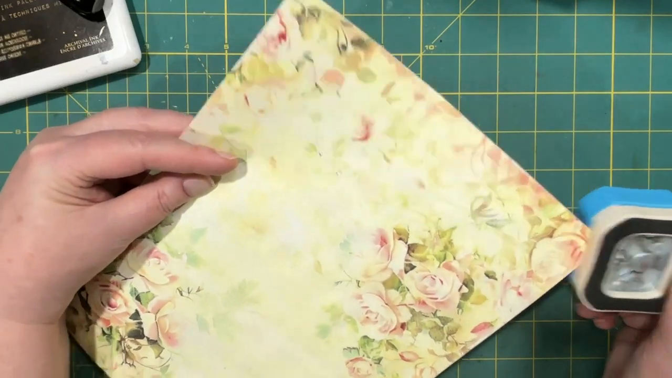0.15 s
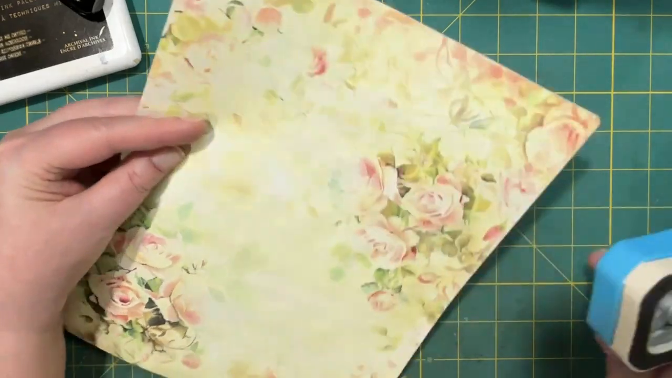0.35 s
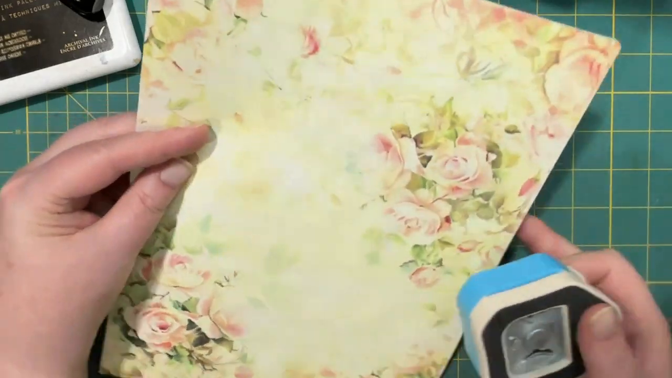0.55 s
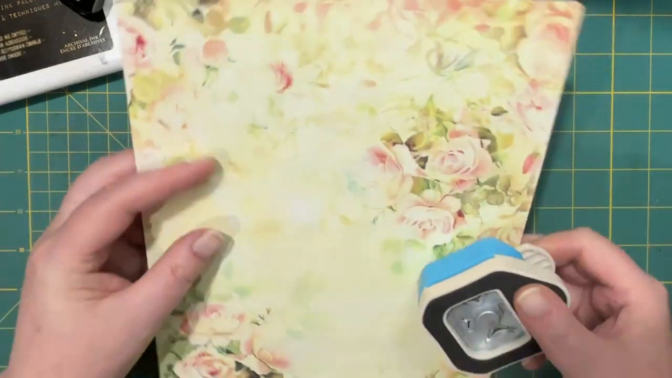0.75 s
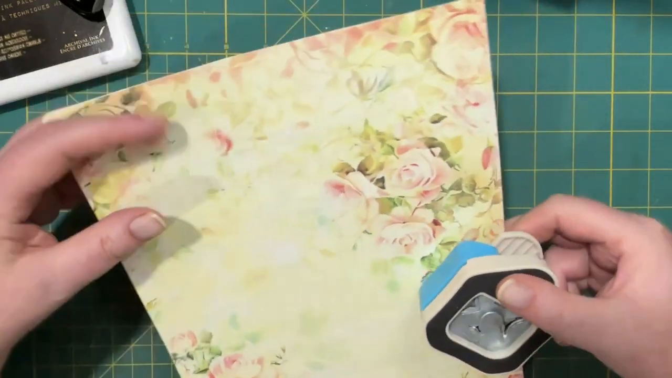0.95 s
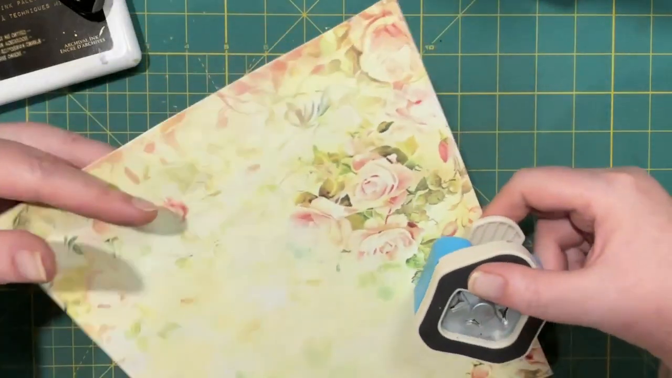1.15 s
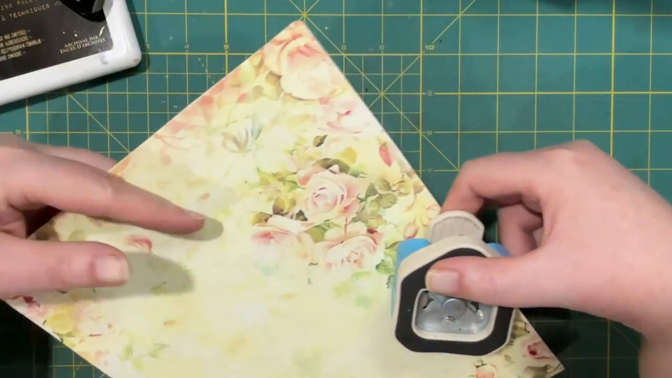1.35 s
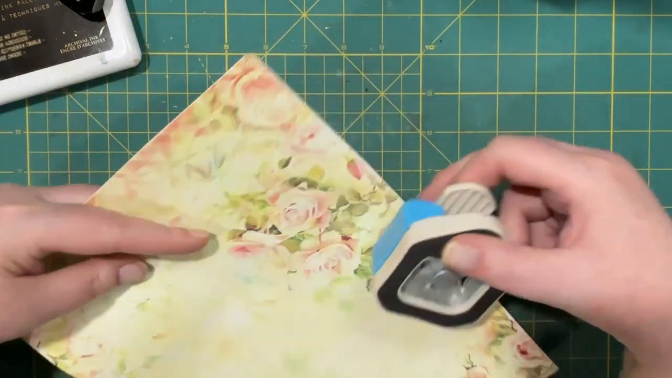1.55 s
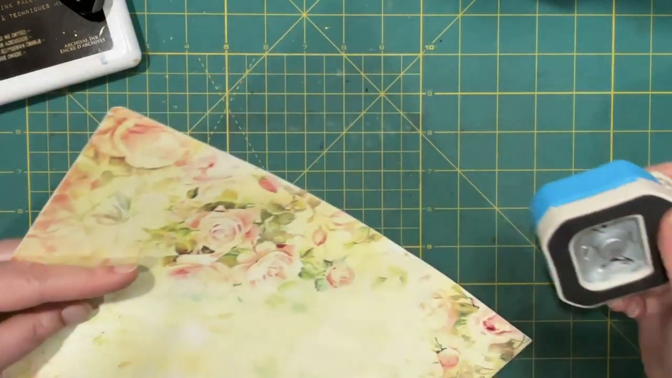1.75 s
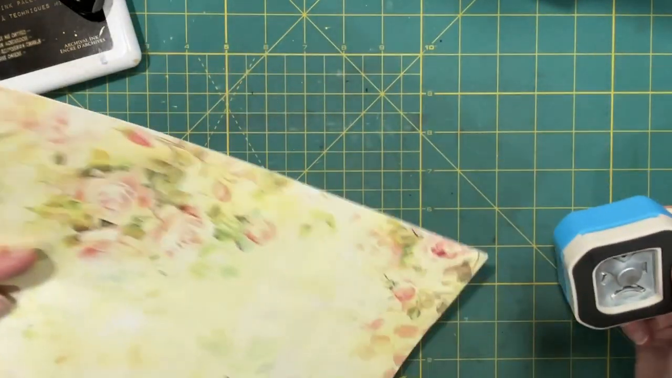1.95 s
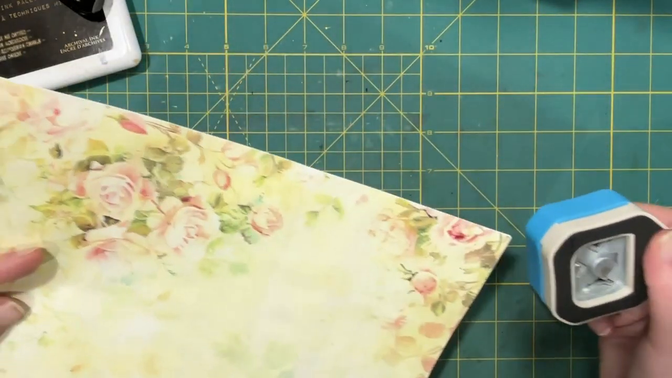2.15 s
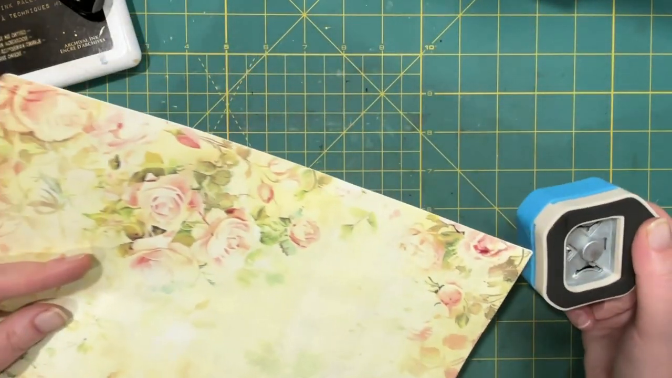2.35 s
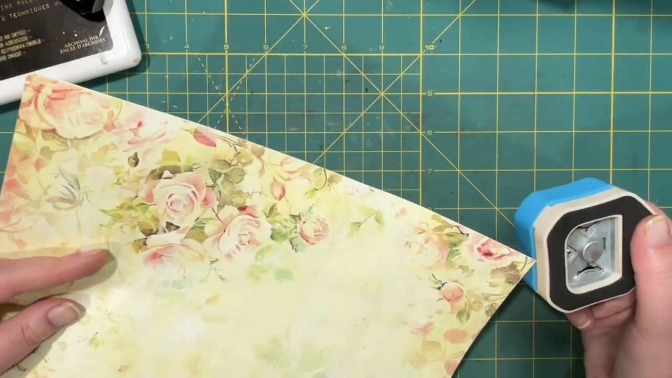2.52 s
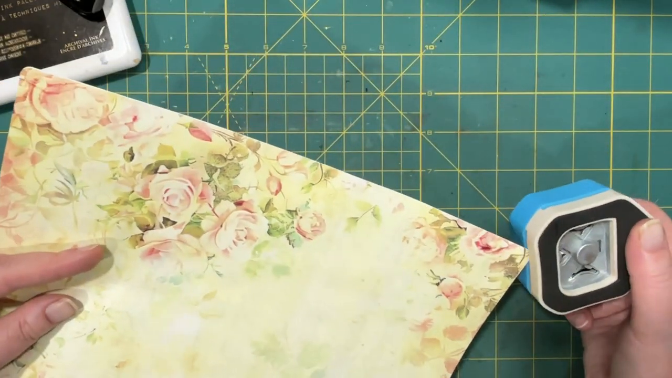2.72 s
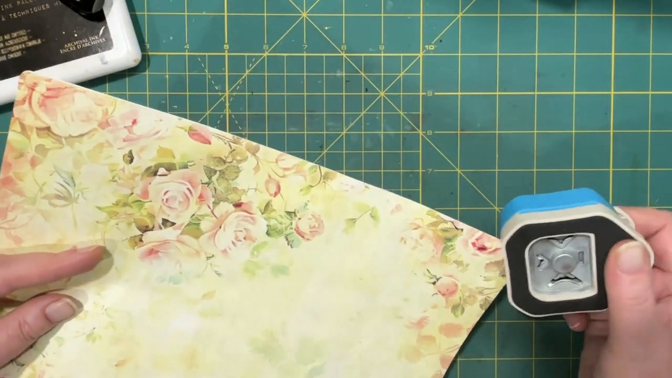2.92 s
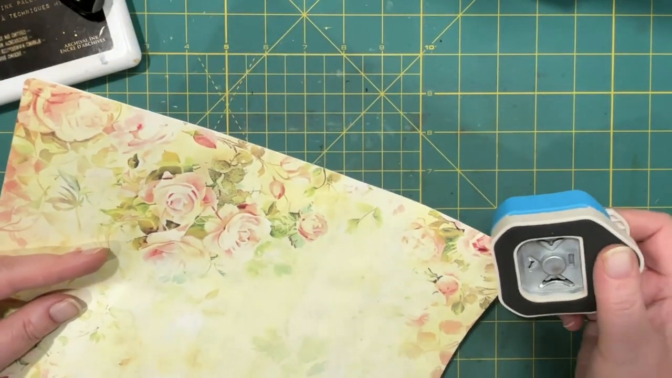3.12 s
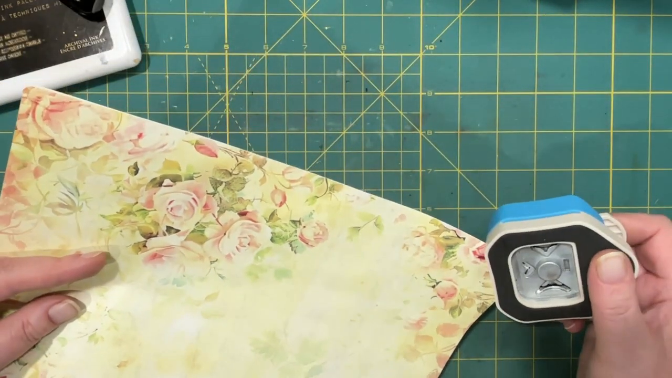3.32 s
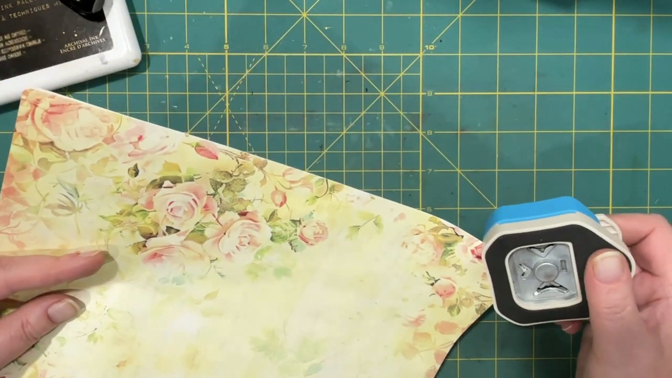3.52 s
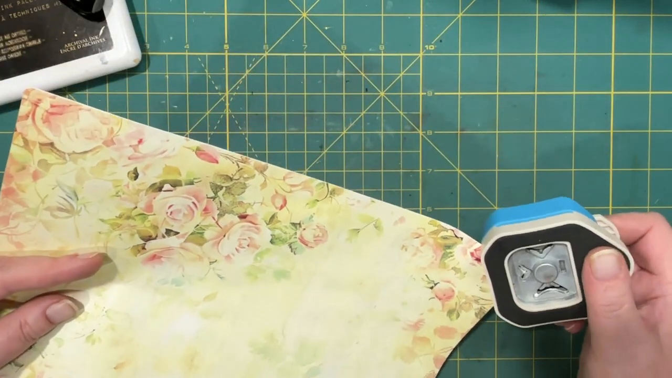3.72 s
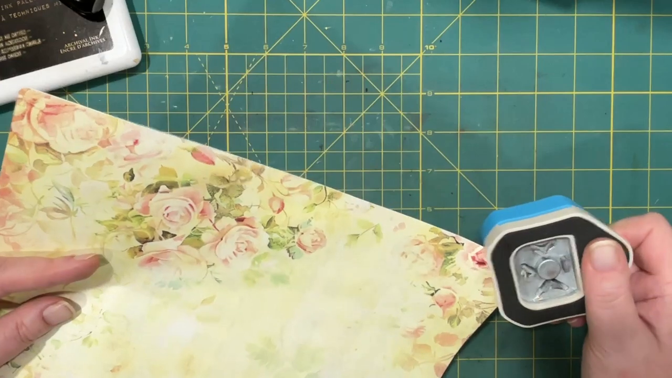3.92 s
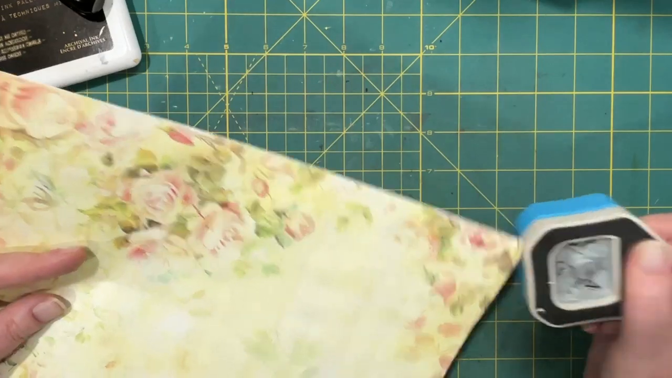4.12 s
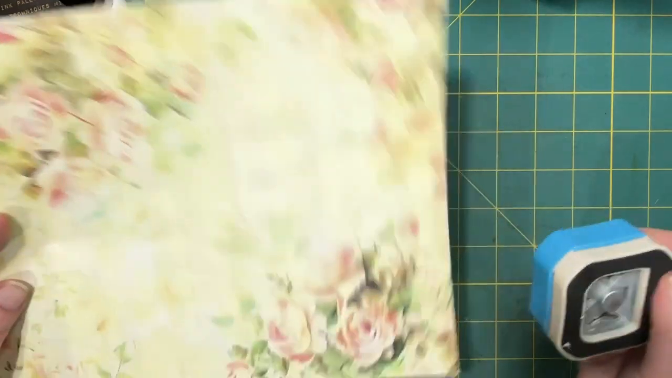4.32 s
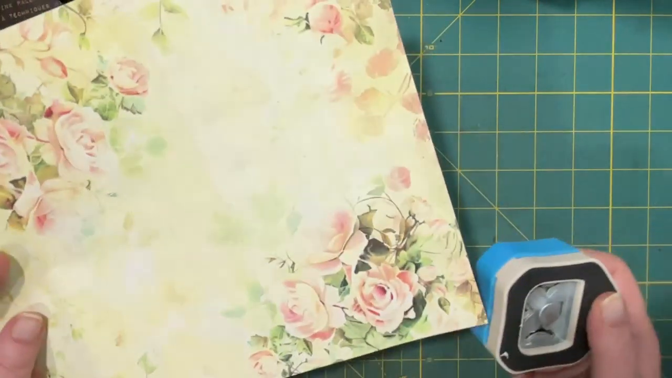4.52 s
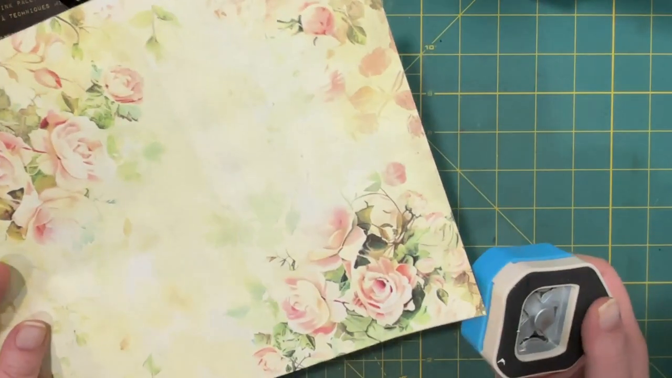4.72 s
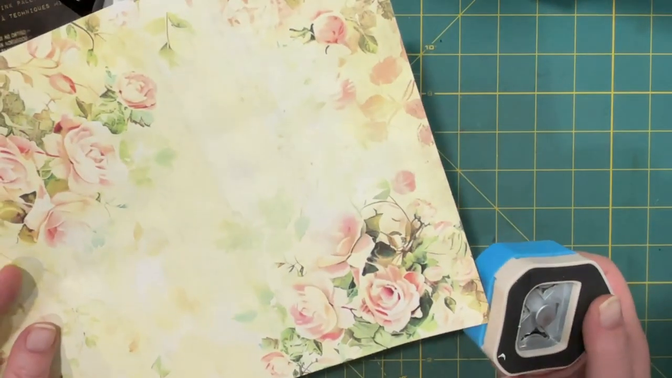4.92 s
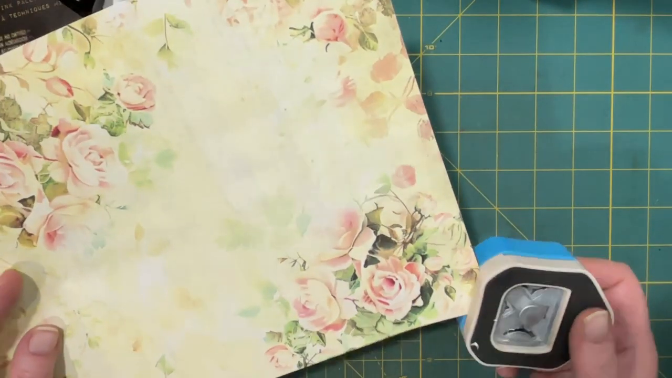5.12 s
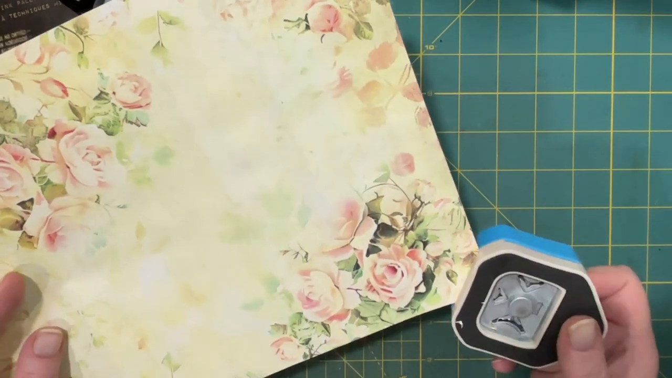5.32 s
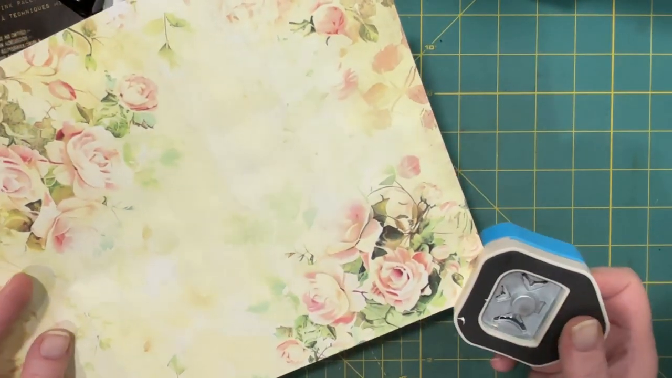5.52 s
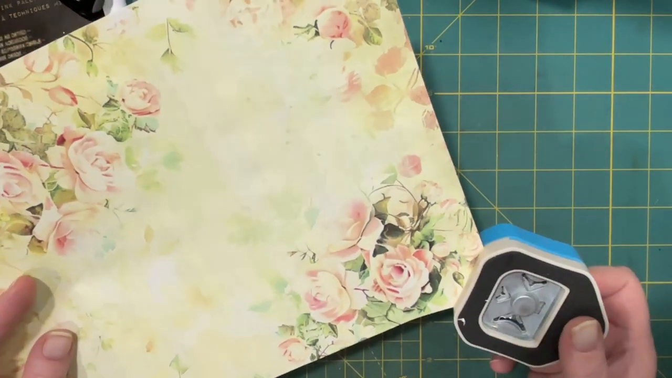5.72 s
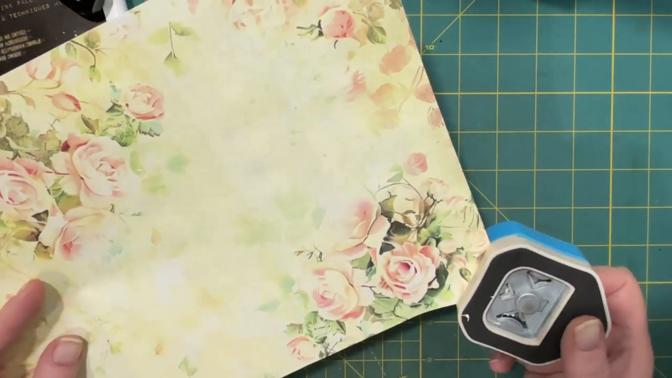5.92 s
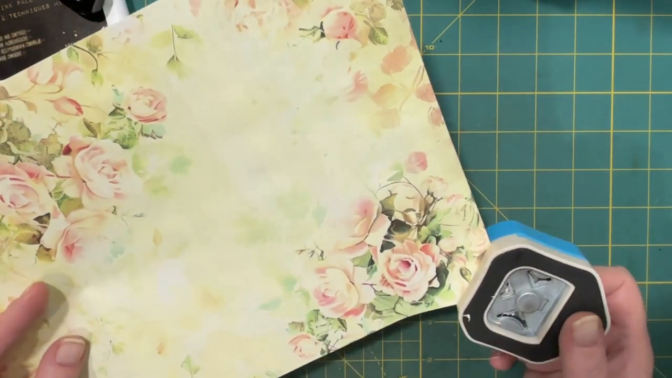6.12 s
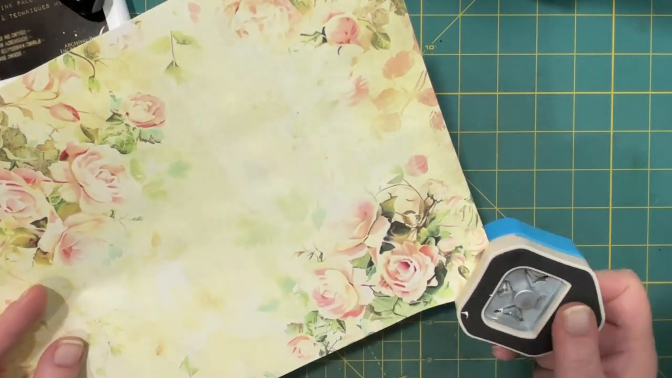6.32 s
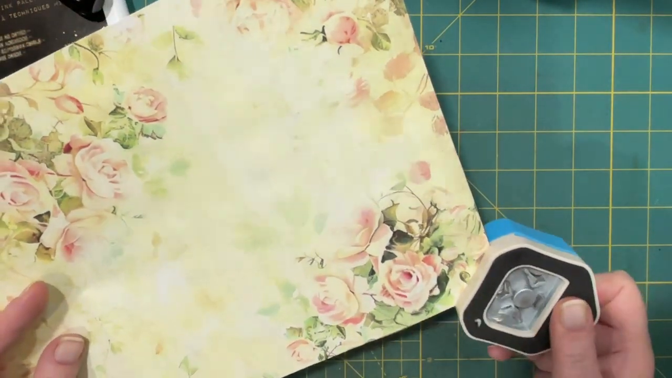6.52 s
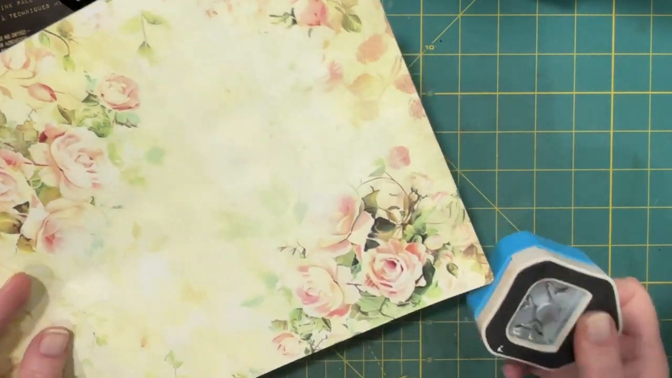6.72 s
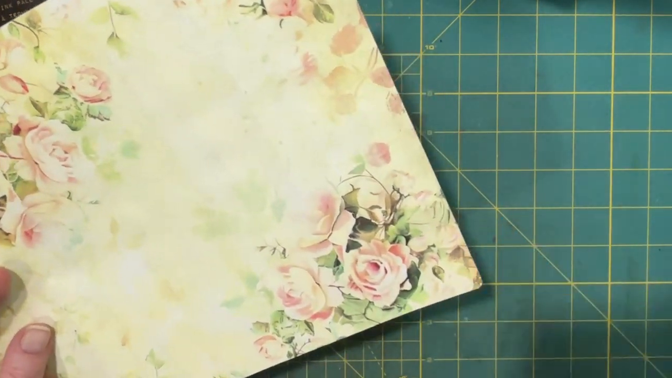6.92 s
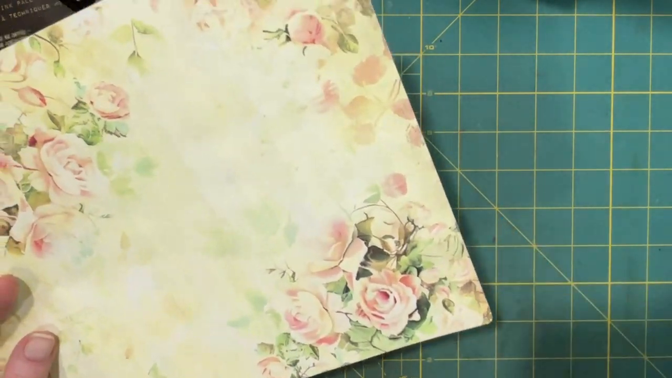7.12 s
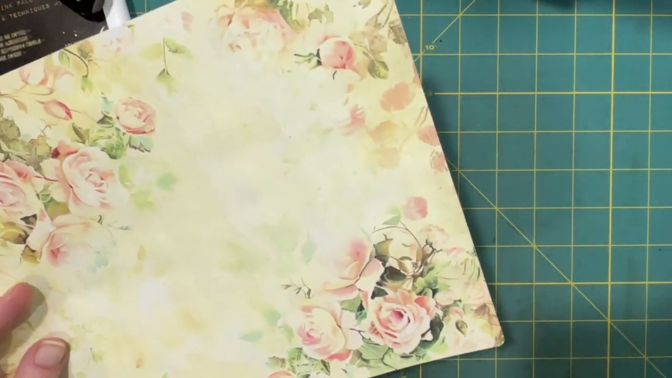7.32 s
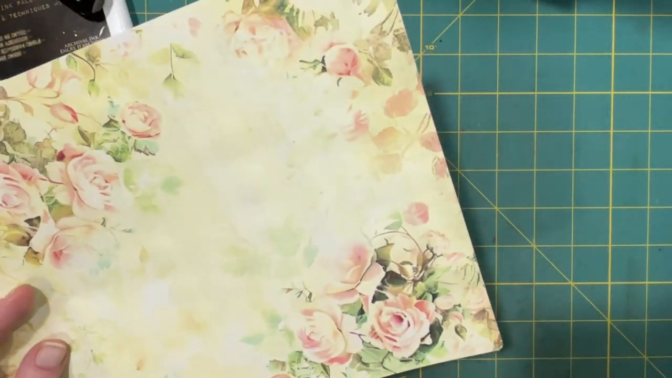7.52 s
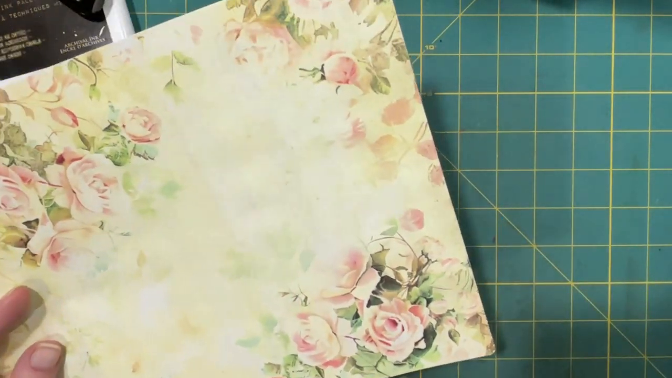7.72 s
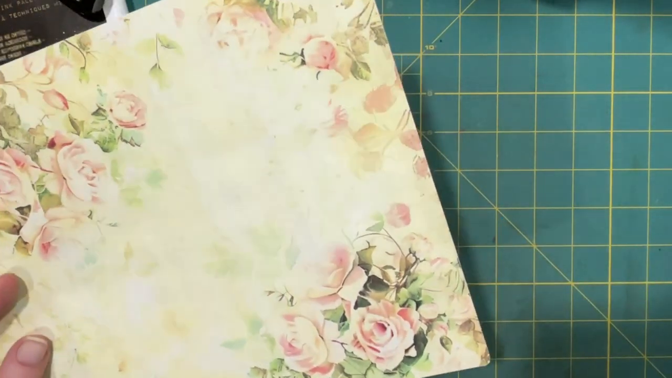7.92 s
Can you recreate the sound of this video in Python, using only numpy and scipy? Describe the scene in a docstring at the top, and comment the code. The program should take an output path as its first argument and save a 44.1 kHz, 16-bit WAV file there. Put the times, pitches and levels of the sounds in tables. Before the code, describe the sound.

Stiff paper swishes and flaps over a cutting mat, then a hand punch snaps sharply through two corners, close up in a small room.

```python
"""A sheet of card swishes and flaps over a cutting mat; then a hand punch rounds two of its corners.
The sliding sheet is friction noise through resonances that follow its bend; flaps, knocks and crackles
are short contacts that excite damped modes. Fibres creak under the blade, the die snaps through in a few
cracks that ring the punch, and its spring rings on. Small room, close stereo pickup; the loudest peaks
are clipped flat."""
import sys
import numpy as np
from scipy import signal
from scipy.fft import rfft, irfft, next_fast_len
from scipy.io import wavfile

SR = 44100
rng = np.random.default_rng(int(sys.argv[2]) if len(sys.argv) > 2 else 0)


def wav_out(sig):
    """Save sig, one row per channel (or a flat mono array), as 16-bit PCM at SR to the path in sys.argv[1]."""
    wavfile.write(sys.argv[1], SR, np.round(np.clip(np.atleast_2d(sig).T, -1, 1) * 32767).astype(np.int16))


N = 351036
TIME = np.arange(N) / SR
BLOW = TIME[:8192]   # time axis of one blow, s

# Strokes of the hand pushing the sheet: [start t/s, length t/s, rub level/dB, drumming level/dB, hiss level/dB]
STROKES = [(0.0, 0.016, -35, -35, -39), (0.064, 0.082, -50.5, -52.5, -55),
           (0.125, 0.33, -53.5, -52.5, -50.5), (0.491, 0.067, -44.5, -56, -43),
           (0.579, 0.22, -54, -69, -53.5), (0.66, 0.07, -50.5, -54.5, -45),
           (0.817, 0.057, -38.5, -45.5, -36), (0.902, 0.056, -43.5, -67, -37.5),
           (0.933, 0.019, -48, -72, -31), (0.968, 0.012, -36, -28, -62), (1.001, 0.038, -41.5, -54, -38.5),
           (1.086, 0.065, -40.5, -44.5, -40.5), (1.176, 0.34, -56, -61, -53), (1.474, 0.15, -45, -42, -48),
           (1.642, 0.17, -44, -52.5, -51), (1.654, 0.052, -42.5, -59, -65),
           (1.834, 0.076, -37.5, -45, -41.5), (1.917, 0.053, -55, -61, -56), (1.977, 0.36, -69, -77, -70),
           (2.606, 0.07, -76, -67, -72), (2.732, 0.21, -70.5, -70.5, -69.5),
           (3.015, 0.038, -55.5, -57, -63), (3.2, 0.12, -70, -64, -88), (3.232, 0.01, -66, -59, -73),
           (3.41, 0.017, -57, -56, -73), (4.042, 0.11, -53.5, -53.5, -56), (4.11, 0.021, -49.5, -57, -57),
           (4.235, 0.17, -53.5, -60.5, -51), (4.4, 0.24, -63.5, -80, -64), (5.023, 0.07, -58, -60.5, -60),
           (5.116, 0.014, -50, -53, -38), (5.535, 0.12, -65, -70, -70.5), (5.802, 0.11, -59, -56, -60),
           (5.969, 0.051, -60, -65, -67), (6.646, 0.22, -60, -64.5, -62.5), (6.61, 0.02, -57, -57.5, -55),
           (6.688, 0.027, -56, -51, -59), (6.865, 0.47, -57, -77, -56.0), (7.385, 0.07, -64, -80, -63.5),
           (7.503, 0.062, -57, -84, -57), (7.747, 0.34, -67.5, -78, -65)]
EASE_S, EASE_SHARE = 0.0056, 0.041   # a stroke eases in and out over this time plus a share of its length
# Main resonance of the sheet as it is bent and lifted: [t/s, f/Hz]
SHEET_PITCH = [(0, 855), (.5, 999), (.7, 847.7), (1.4, 827.4), (1.58, 883.7), (1.68, 1017), (1.85, 1039),
               (1.97, 760), (4.05, 922), (4.14, 794.5), (4.3, 1056), (5.3, 723), (5.9, 781.5), (6.7, 639),
               (7.2, 1375)]
DRUM_HZ = 900   # resonance of the sheet lying flat
# Bending modes of the sliding card: [f/Hz at rest, t60 t/s at rest, level/dB relative to the rub]
FLEX_MODES = [(1270, 0.026, -14), (1995, .008, -14), (3130, 0.0066, -15), (4080, 0.0038, -15.5)]
FLEX_DRIFT, FLEX_SWING_DB = .08, 3   # random drift of log pitch, random swing of level
FLEX_TURNS_PER_S, FLEX_PLUCKS_PER_S = 24, 450
# Squeaks of the dragged edge: [start t/s, length t/s, first f/Hz, last f/Hz, level/dB]
SQUEAKS = [(1.885, 0.091, 1140, 692, -45), (4.069, 0.045, 930, 850, -50), (4.089, 0.041, 580, 840, -53),
           (4.091, 0.02, 957, 850, -53), (4.121, 0.037, 880, 816, -41), (4.12, .15, 639, 375, -60),
           (4.096, 0.072, 1400, 1180, -56), (1.815, 0.074, 2250, 1900, -49), (1.831, 0.071, 959, 1196, -43),
           (5.045, .06, 1950, 1815, -57), (5.088, 0.08, 1754, 1845, -53), (5.33, 0.067, 743, 710, -56),
           (6.939, 0.039, 3080, 2940, -54), (7.225, 0.059, 1557, 1755, -60)]
SQUEAK_HZ, SQUEAK_T60_S = 900, 0.1   # the resonance that sings, before its glide
# Strokes of the corner on the slot or the mat: [centre t/s, half length t/s, chirp level/dB]
BRUSHES = [(0.97, 0.0021, -28), (1.933, 0.0023, -38), (2.02, 0.0045, -58.5), (2.143, 0.0015, -51),
           (2.254, 0.0051, -57), (2.329, 0.0015, -52.5), (4.564, 0.0025, -56.5), (4.744, 0.015, -62.5),
           (4.865, 0.013, -57), (5.365, 0.011, -54.5), (5.47, 0.0098, -52.5), (7.246, 0.002, -39.5)]
# Hiss relative to chirp at a half length of 10 ms, and its rise per doubling of that length
BRUSH_HISS_DB, BRUSH_HISS_DB_PER_OCTAVE = -6, 16.5
CORNER_HZ, CORNER_T60_S, CORNER_DB = 4160, 0.0073, -17   # ring of the stiff corner, relative to its chirp
# The sheet drawn away around the second cut: [start t/s, length t/s, first f/Hz, last f/Hz, level/dB]
SLIDE = (6.5, 0.38, 780, 1651, -62.5)
# Flaps of the sheet on the mat: [t/s, hollow f/Hz, hollow level/dB, tick level/dB]
FLAPS = [(0.075, 820, -44.5, -72), (.126, 827, -35.5, -43), (.638, 900, -48, -65),
         (0.697, 1080, -45, -42.5), (.771, 1071, -42.5, -44), (.858, 1150, -39.5, -41),
         (.961, 730, -35, -55), (.969, 924, -23.5, -32.5), (.975, 880, -26.5, -57), (.983, 626, -31.5, -60),
         (1.074, 940, -47, -43.5), (1.092, 1108, -44, -51), (1.099, 780, -35, -61), (1.16, 1000, -48, -48),
         (1.226, 940, -45.5, -50.5), (1.236, 834.6, -43, -69), (1.447, 900, -45.5, -60),
         (1.487, 828, -35, -58), (1.493, 900, -29.5, -42), (1.526, 854, -32, -36.5),
         (1.548, 1070, -30.5, -60), (1.559, 900, -45, -58), (1.576, 900, -33.5, -41),
         (1.585, 690, -37, -46), (1.615, 1087, -61, -39.5), (1.689, 943, -34, -58)]
FLAP_CONTACT_S, FLAP_EDGE_DB, FLAP_THUMP_DB = 0.0018, -2, -46.5   # edge relative to the tick
# Knocks of the plastic punch on card and mat: [t/s, hollow f/Hz, hollow level/dB, tick level/dB,
# paper edge level/dB, casing ping f/Hz, ping level/dB]
KNOCKS = [(2.408, 810, -49.5, -46.5, -54, 1850, -45.5), (3.0063, 890, -43.5, -49.5, -63.5, 1250, -54),
          (3.025, 770, -44, -53, -60, 1500, -63), (3.084, 940, -62, -42, -52, 1690, -43.5),
          (3.178, 749, -56.5, -63, -80, 4200, -71), (3.216, 851, -47, -55, -67.5, 1249, -53),
          (3.45, 980, -50, -57, -72, 1220, -53), (5.137, 735, -28, -42, -50, 2190, -41),
          (5.192, 680, -31.5, -38, -44.5, 3270, -43), (5.224, 625, -47, -48, -55.5, 2300, -56),
          (5.48, 640, -48.5, -46, -53.5, 2530, -49.5), (5.6334, 671, -27.5, -41, -63, 1706, -61),
          (5.776, 753, -31, -38.5, -49.5, 1790, -42), (5.877, 808, -41, -45, -56.5, 1910, -48),
          (5.969, 999, -51.5, -43, -51, 2386, -52.5), (6.549, 687, -35.5, -58, -53, 1600, -60),
          (6.69, 637, -51, -44.5, -50.5, 1580, -40.5)]
KNOCK_CONTACT_S, KNOCK_THUMP_DB = 0.0016, -45.5
PING_T60_S = 0.012   # the struck part of the casing
# Crackles of the stiff card under the blade or flicked at its edge: [t/s, tick level/dB, edge level/dB]
CRACKLES = [(.055, -44, -66), (.11, -49, -50), (.162, -43, -50), (0.225, -49, -50), (0.672, -54, -34),
            (.812, -42, -39.5), (0.842, -42, -41), (1.121, -37, -37.5), (1.608, -39, -49),
            (1.652, -43, -55), (1.679, -41, -57), (1.745, -47, -54), (1.825, -45.5, -58),
            (1.884, -36.5, -37), (1.896, -44, -48), (3.824, -43, -50), (3.837, -43, -50.5),
            (3.89, -32, -38.5), (3.913, -33.5, -41), (4.345, -35, -41), (6.254, -44, -52.5),
            (6.265, -40.5, -40.5), (6.33, -44, -45), (6.361, -35, -38), (6.38, -34.5, -42.5),
            (6.956, -51, -53), (7.24, -70, -52), (7.775, -74.5, -54), (7.89, -73, -47)]
CRACKLE_HZ, CRACKLE_CONTACT_S = 940, 0.0018
CRACKLE_HOLLOW_DB, CRACKLE_THUMP_DB = -13.5, -53   # hollow relative to the tick
THUMP_FOLLOWS = 0.25   # dB of table thump per dB of hollow tock; thump levels above are for a 0 dB tock
# Hand and punch bumping and dragging on the mat: [t/s, swell time t/s, level/dB]
BUMPS = [(0.069, 0.0076, -46), (.122, 0.011, -47.5), (0.642, 0.0097, -43.5), (.772, 0.016, -47),
         (.83, 0.012, -45), (.966, 0.012, -48.5), (1.097, 0.0035, -49), (1.119, 0.021, -50),
         (1.233, 0.0056, -50.5), (1.493, 0.014, -43), (1.575, 0.016, -53), (3.007, 0.0022, -53.5),
         (3.216, 0.0021, -56.5), (5.48, 0.0031, -50.5), (6.36, 0.012, -46.5), (6.522, .018, -44),
         (6.621, 0.0071, -53)]
# Bending wave of a bump: first pitch, level against the thud, decay per travel time
WAVE_HZ, WAVE_DB, WAVE_DAMPING = 753, -2.5, 1.7
WAVE_TRAVEL_S, WAVE_SPREAD = .006, 1.8   # travel time, lengthened by this multiple of the swell time
# The blade pressing into the card, levels before the trims in creak():
# [t/s, groan level/dB, creak level/dB, fibre hiss level/dB]
FIRST_PRESS = [(3.7, -75.5, -75.5, -101.5), (3.76, -65.5, -47, -81.5), (3.8, -56, -49, -61),
               (3.83, -52.5, -35.5, -43.5), (3.87, -61, -55, -55.5), (3.9, -58, -40.5, -51.5),
               (3.915, -34, -43.5, -52), (3.93, -52, -43.5, -58.5)]
SECOND_PRESS = [(6.16, -70, -71, -87), (6.188, -53.5, -49, -95), (6.235, -49, -48, -59),
                (6.25, -70, -57.5, -68), (6.3, -62, -47.5, -45.5), (6.35, -62, -45.5, -46.5),
                (6.376, -38, -46.5, -48.5), (6.4, -57, -68, -68.5), (6.44, -70, -64.5, -68)]
# Cracks of the die breaking through and bouncing, levels before the trims in snaps():
# [t/s, ring level/dB, crack level/dB, crack decay to 1/e t/s, press number]
SNAPS = [(3.9334, -24, -15.5, 0.005, 0), (3.935, -10.5, -16.5, 0.002, 0), (3.938, -18.5, -26, 0.002, 0),
         (3.9452, -29, -30.5, .0015, 0), (3.9521, -30, -32.5, .0015, 0), (6.5102, -34, -35.5, .002, 1),
         (6.5146, -22, -11, 0.0011, 1), (6.5157, -12, -9, 0.0013, 1), (6.5182, -11, -13, 0.0012, 1),
         (6.5262, -24, -26.5, 0.0016, 1), (6.5299, -24.5, -29, .0015, 1), (6.551, -41.5, -42, 0.0024, 1)]
# Modes of the punch, gripped differently at each press:
# [f/Hz, t60 t/s, relative level/dB at first press, relative level/dB at second press]
PUNCH_MODES = [(550, 0.037, -7.5, -20.5), (650, 0.05, -14.5, -7), (775, .035, -25.5, -11.5),
               (945, 0.051, -11, -14.5), (1160, .022, -3.5, -9), (1305, 0.03, -3, -9.5),
               (1568, 0.03, -3.5, 1), (1850, 0.019, -0.5, -2), (2270, 0.03, -6.5, -7),
               (2520, 0.034, -0.5, -21), (3350, 0.02, -17.5, -5.5), (3550, .04, -13.5, -10),
               (3800, .055, -10.5, -7.5), (4085, 0.025, 1, -9), (4303, 0.016, -11.5, 3),
               (4740, 0.05, -15, -12), (5430, .04, -20.5, -12.5), (6590, 0.038, -2.5, -13),
               (11200, .02, -12, -12.5), (13040, 0.012, -2.5, -7), (13300, 0.027, -10.5, -12)]
# Modes of the return spring, set ringing as the die gives way:
# [f/Hz, t60 t/s, relative level/dB at first press, relative level/dB at second press]
SPRING_MODES = [(994, 0.41, -4.5, -5.5), (1010, 0.22, -20, -19.5), (1635, .24, -8.5, -7),
                (1740, 0.22, -10.5, -22.5), (2500, 0.13, -3, -27), (2885, .3, -22.5, -16),
                (3600, 0.17, -21.5, -11), (4420, 0.2, -17, -3.5)]
# Spectra, all with columns [f/Hz, relative level/dB per Hz]
DRUM = [(40, -22.5), (70, -11.5), (160, -22.5), (400, -17), (560, -7), (800, -2), (950, 2), (1200, -6.5),
        (1700, -10), (4000, -45)]   # drumming and groaning of the sheet
RUB = [(300, -24.5), (800, -14.5), (1300, -10), (1800, -4.5), (2700, -2.5), (4500, -1), (6300, -3.5),
       (7600, -26.5), (11000, -17)]   # rub of card on mat
HISS = [(2000, -32.5), (5000, -3), (6300, 1), (7500, -6), (9200, -1), (11000, -3), (13000, -1.5),
        (14800, -6), (16300, -24.5)]   # fibres and paper edge
CHIRP = [(400, -30), (1000, -14), (1500, -3), (3200, -4), (4300, 6), (4800, -2.5), (5800, 2), (9000, -48)]   # stiff corner brushing past
SLIDE_COLOUR = [(400, -31), (620, -21), (780, 0), (950, -1), (1230, 2.5), (1600, -7.5), (2600, -9.5),
                (5000, -21)]   # sheet drawn away, at the start of its glide
TICK = [(300, -34.5), (900, -7.5), (1400, -0.5), (2000, -3), (3000, -5), (4300, -4.5), (6000, -2),
        (8000, -1.5), (12000, -26)]   # hard contact
THUMP = [(25, -16.5), (60, -4.5), (150, -5), (300, -2.5), (550, -7), (1200, -41)]   # table under a touch
THUD = [(25, -10.5), (60, -3.5), (130, -6.5), (300, -6.5), (550, -11.5), (1200, -40)]   # mat and table under a push
CREAK = [(400, -26), (900, -14.5), (1350, 4.5), (1650, 9.5), (2100, 3.5), (3000, -2), (4150, 0),
         (5000, -7.5), (6200, -13.5), (8000, -20), (12000, -34)]   # fibres slipping under the blade
CRACK = [(60, -16), (150, -12.5), (390, -23), (560, 6), (1100, 4.5), (2400, -3.5), (2850, -13),
         (3500, -10.5), (4200, -4), (6200, 4.5), (7800, -11.5), (10000, -8), (13000, 0), (15000, -7),
         (16500, -22)]   # card shearing
SPREAD = [(50, -14.5), (150, -8), (380, -15.5), (600, -2.5), (1000, -4.5), (1600, -0.5), (2800, -9),
          (4300, 1.5), (6200, -1), (8000, -12.5), (10000, -9.5), (13000, -4.5), (16000, -15.5)]   # what a snap sends into the room, summed over all directions
ROOM_TONE = [(20, -19.5), (40, -2), (65, 4), (110, -1), (400, -1), (560, -6), (950, -3), (1150, -8),
             (1400, -2.5), (2600, -11.5), (4600, -18.5), (7300, -24.5), (13000, -27.5), (16000, -39)]   # steady noise of the room
ROOM_TONE_DB = -63   # of the part common to both channels
# Phase between the two channels: [f/Hz, phase/rad by which left leads]
CHANNEL_PHASE = [(100, 0), (2000, -.05), (3000, -.5), (4700, -.5), (5700, -3.5), (6400, -3.7), (8200, -2.7),
                 (10900, -.7), (13500, .3), (16000, 1.5)]
CUTOFF_HZ = 16200


def sheet():
    """Stick-slip friction drives a membrane: hiss and crinkle, with drumming at a pitch that follows the bend."""
    rub, drum, hiss = strokes()
    bend = np.interp(TIME, *np.transpose(SHEET_PITCH)) / DRUM_HZ

    squeak = rms_one(ring(rng.standard_normal(N), DRUM_HZ, t60=0.013))
    rasp = friction(DRUM, per_s=700, grain_share=0.55, flutter_db=4, flutter_hz=120)
    membrane = glide(rasp + from_db(-10.5) * squeak, bend)

    crinkle = friction(RUB, per_s=330, grain_share=.98, flutter_db=3, flutter_hz=45)
    grind = friction(RUB, per_s=1600, grain_share=0.4, flutter_db=3, flutter_hz=130)
    scrape = glide(from_db(-7.5) * (grind + crinkle), bend ** .25) + flexing()

    fibres = friction(HISS, per_s=2900, grain_share=0.15, flutter_db=2.5, flutter_hz=88.6)
    low = pan(drum * membrane + squeaks(), left_db=-5.0)
    return low + pan(rub * scrape, left_db=-10.0) + pan(hiss * fibres, left_db=0.5)


def strokes():
    """Friction sounds only during motion: each push eases in, holds and eases out (gains of rub, drum, hiss)."""
    out = np.zeros((3, N))
    for start_s, length_s, *levels_db in STROKES:
        ease_s = EASE_S + EASE_SHARE * length_s
        onset = (1 + np.tanh((TIME - start_s) / (2 * ease_s))) / 2
        release = (1 - np.tanh((TIME - start_s - length_s) / (2 * ease_s))) / 2
        out += np.outer(from_db(levels_db), onset * release)
    return out


def flexing():
    """Flexural modes plucked by catching fibres: each drifts in pitch and fades in and out on its own."""
    out = np.zeros(N)
    for hz, t60, db in FLEX_MODES:
        gain = from_db(db + FLEX_SWING_DB * wander(FLEX_TURNS_PER_S))
        mode = rms_one(ring(catches(FLEX_PLUCKS_PER_S), hz, t60))
        out += gain * glide(mode, np.exp(FLEX_DRIFT * wander(FLEX_TURNS_PER_S)))
    return out


def squeaks():
    """Friction feeds one narrow resonance of the dragged edge, gliding as the sheet bends or flattens."""
    out = np.zeros(N)
    for start_s, length_s, first_hz, last_hz, db in SQUEAKS:
        progress = np.clip((TIME - start_s) / length_s, 0, 1)
        note = rms_one(ring(rng.standard_normal(N), SQUEAK_HZ, SQUEAK_T60_S))
        hz = first_hz + (last_hz - first_hz) * progress
        out += from_db(db) * np.sin(np.pi * progress) ** 2 * glide(note, hz / SQUEAK_HZ)
    return out


def brushes():
    """Brief friction of the stiff corner swells and fades: quick strokes chirp, slow ones also hiss."""
    out = np.zeros(N)
    chirp, hiss = (rms_one(colour(rng.standard_normal(N), spectrum)) for spectrum in (CHIRP, HISS))
    corner = rms_one(ring(rng.standard_normal(N), CORNER_HZ, CORNER_T60_S))
    chirp = rms_one(chirp + from_db(CORNER_DB) * corner)
    for s, half_s, chirp_db in BRUSHES:
        hiss_db = BRUSH_HISS_DB + BRUSH_HISS_DB_PER_OCTAVE * np.log2(half_s / .01)
        swell = np.exp(-.5 * ((TIME - s) / half_s) ** 2)
        out += from_db(chirp_db) * swell * (chirp + from_db(hiss_db) * hiss)
    return out


def slide_away():
    """A shorter contact resonates higher: the edge pitch rises as less of the sheet touches the mat."""
    start_s, length_s, first_hz, last_hz, db = SLIDE
    progress = np.clip((TIME - start_s) / length_s, 0, 1)
    edge = friction(SLIDE_COLOUR, per_s=410, grain_share=0.22, flutter_db=5.0, flutter_hz=41.6)
    ratio = 1 + (last_hz / first_hz - 1) * progress
    return from_db(db) * np.sin(np.pi * progress) * glide(edge, ratio)


def knocks():
    """Impact excitation: flaps, knocks and crackles are the same touch in different proportions."""
    touches = []
    for s, hz, hollow_db, tick_db in FLAPS:
        touches.append((s, touch(FLAP_CONTACT_S, hz, hollow_db, tick_db, tick_db + FLAP_EDGE_DB, FLAP_THUMP_DB)))
    for s, hz, hollow_db, tick_db, edge_db, *_ in KNOCKS:
        touches.append((s, touch(KNOCK_CONTACT_S, hz, hollow_db, tick_db, edge_db, KNOCK_THUMP_DB)))
    for s, tick_db, edge_db in CRACKLES:
        hollow_db = tick_db + CRACKLE_HOLLOW_DB
        touches.append((s, touch(CRACKLE_CONTACT_S, CRACKLE_HZ, hollow_db, tick_db, edge_db, CRACKLE_THUMP_DB)))
    tocks, ticks = np.zeros((2, N))
    for s, (tock, click) in touches:
        add(tocks, s, tock)
        add(ticks, s, click)
    return pan(tocks, left_db=-4.0) + pan(ticks, left_db=-2.5)


def touch(contact_s, hz, hollow_db, tick_db, edge_db, thump_db):
    """Superposition: a hollow tock with a table thump, and a hard tick with a flick of the paper edge."""
    body = hollow(hz, t60=0.0019 + 13 * contact_s, push_s=0.000059)
    thump = unit_blow(colour(scuff(0.0028), THUMP))
    tock = from_db(hollow_db) * body + from_db(thump_db + THUMP_FOLLOWS * hollow_db) * thump
    edge = unit_blow(colour(scuff(contact_s), HISS))
    click = from_db(tick_db) * tick(contact_s, edge_db - tick_db) + from_db(edge_db) * edge
    return tock, click


def hollow(hz, t60, push_s):
    """Modal response to a soft push: three close, damped modes over a fixed 550 Hz mode shared by all touches."""
    push = BLOW * np.exp(-BLOW / push_s)
    modes = [(.8 * hz, -5, 1), (hz, 0, -1), (1.175 * hz, -3, 1), (550, -7, -1)]   # (f/Hz, level/dB, sign)
    body = sum(sign * from_db(db) * ring(push, f, t60) for f, db, sign in modes)
    return unit_blow(small_body(body, edge_hz=460))


def tick(contact_s, hardness_db):
    """Contact stiffness sets bandwidth: a padded touch loses the top of its tick."""
    top_hz = np.clip(3200 * from_db(4.7 * (hardness_db + 8.0)), 2000, 12000)
    low_pass = signal.butter(2, top_hz, fs=SR, output="sos")
    return unit_blow(signal.sosfilt(low_pass, colour(scuff(contact_s), TICK)))


def pings():
    """Local modal excitation: each knock rings the part of the plastic casing that it lands on."""
    out = np.zeros(N)
    for s, *_, ping_hz, ping_db in KNOCKS:
        add(out, s, from_db(ping_db) * unit_blow(ring(scuff(.0005), ping_hz, PING_T60_S)))
    return pan(out, left_db=-2.8)


def bumps():
    """Mat and table thud; a dispersive bending wave in the sheet brings its highs before its lows."""
    out = np.zeros(N)
    for s, swell_s, db in BUMPS:
        age = BLOW / (WAVE_TRAVEL_S + WAVE_SPREAD * swell_s)
        hz = WAVE_HZ / (1 + age) ** 2
        wave = np.sin(2 * np.pi * np.cumsum(hz) / SR) * np.sqrt(age) * np.exp(-WAVE_DAMPING * age)
        thud = unit_blow(colour(scuff(swell_s), THUD))
        add(out, s, from_db(db) * unit_blow(thud + from_db(WAVE_DB) * unit_blow(wave)))
    return pan(out, left_db=-2.5)


def creak():
    """Progressive fracture: under the blade the fibres give way in small uneven slips."""
    groan, strain, hiss = sum(np.array(gains(press)) for press in (FIRST_PRESS, SECOND_PRESS))
    moans = friction(DRUM, per_s=120, grain_share=.3, flutter_db=1.0, flutter_hz=102.0)
    slips = friction(CREAK, per_s=500, grain_share=.45, flutter_db=3.5, flutter_hz=140)
    fibres = friction(HISS, per_s=900, grain_share=0.5, flutter_db=7.5, flutter_hz=148.5)
    return groan * from_db(-4.5) * moans + strain * from_db(-3.0) * slips + hiss * from_db(0.5) * fibres


def snaps(signs):
    """Shear fracture in a few cracks within milliseconds excites the punch modes; signs give their directions."""
    out, blow = np.zeros(N), signal.unit_impulse(len(BLOW))
    for s, ring_db, crack_db, decay_s, press in SNAPS:
        body = np.zeros(len(BLOW))
        for sign, (hz, t60, *dbs) in zip(signs, PUNCH_MODES):
            body += sign * from_db(dbs[press]) * unit_blow(ring(blow, hz, t60))
        body = small_body(body, edge_hz=470)
        crack = unit_blow(colour(burst(decay_s), CRACK))
        add(out, s, from_db(crack_db - 3.5) * crack + from_db(ring_db - 11.0) * body)
    return out


def presses():
    """Energy summation: each press as a whole, (t/s at the energy centre of its cracks, strength)."""
    s, ring_db, crack_db, _, press = np.transpose(SNAPS)
    energy = from_db(ring_db) ** 2 + from_db(crack_db) ** 2
    shares = [energy * (press == number) for number in range(2)]
    return [(np.average(s, weights=share), np.sqrt(share.sum())) for share in shares]


def spring():
    """Light damping: thin steel, kicked once as the die gives way, rings far longer than the plastic."""
    out, kick = np.zeros(N), signal.unit_impulse(SR)
    for number, (s, strength) in enumerate(presses()):
        steel = sum(from_db(dbs[number]) * ring(kick, hz, t60) for hz, t60, *dbs in SPRING_MODES)
        add(out, s, strength * from_db(-30.5) * steel)
    return out


def snap_spread():
    """Radiated power: seen from the walls, the cracks of one press merge into a single broad pulse."""
    out = np.zeros(N)
    pulse = unit_blow(colour(signal.unit_impulse(len(BLOW)), SPREAD))
    for s, strength in presses():
        add(out, s, strength * pulse)
    return out


def room(to_desk, to_walls):
    """Reflection: the desk returns early echoes, the walls a short tail partly common to both sides."""
    desk = from_db(-13.5) * echoes(delay_s=0.0046, t60=0.05, treble_t60=0.084)
    mid, side = (from_db(-10.0) * echoes(delay_s=0.0056, t60=0.29, treble_t60=0.13) for _ in range(2))
    sides = [mid + sign * from_db(-2) * side for sign in (1, -1)]
    walls = np.array([signal.oaconvolve(to_walls, response)[:N] for response in sides])
    return signal.oaconvolve(to_desk, desk)[:N] + walls


def echoes(delay_s, t60, treble_t60):
    """Exponential decay of dense reflections, of unit energy; the treble has a decay time of its own."""
    noise = rng.standard_normal(SR // 2)
    age = np.maximum(TIME[:len(noise)] - delay_s, 0)
    low = signal.sosfilt(signal.butter(1, 2500, fs=SR, output="sos"), noise)
    response = low * from_db(-60 * age / t60) + (noise - low) * from_db(-60 * age / treble_t60)
    response = response * (age > 0)
    return response / np.sqrt(np.sum(response ** 2))


def room_tone():
    """Partial coherence: steady low noise of the room, mostly common to both channels."""
    mid, side = (rms_one(colour(rng.standard_normal(N), ROOM_TONE)) for _ in range(2))
    return from_db(ROOM_TONE_DB) * (mid + from_db(-8) * side * [[1], [-1]])


def friction(spectrum, per_s, grain_share, flutter_db, flutter_hz):
    """Stick-slip: catching fibres over a fine hiss, under a wavering pressure; rms 1."""
    drive = np.sqrt(grain_share) * catches(per_s) + np.sqrt(1 - grain_share) * rng.standard_normal(N)
    return rms_one(colour(drive * from_db(flutter_db * wander(flutter_hz)), spectrum))


def catches(per_s):
    """Random point process: fibres catch and let go in clicks of uneven size and either sign, rms 1."""
    caught = rng.random(N) < per_s / SR
    size_db = 4.5 * np.minimum(rng.exponential(1, N), 3)
    return rms_one(caught * rng.choice([-1, 1], N) * from_db(size_db))


def wander(per_s):
    """Linear interpolation between independent random values, per_s of them a second."""
    return np.interp(TIME * per_s, np.arange(N), rng.standard_normal(N))


def ring(x, hz, t60):
    """Damped harmonic oscillator: one mode, driven by x."""
    r, w = from_db(-60 / (t60 * SR)), 2 * np.pi * hz / SR
    return signal.lfilter([1, 0, -1], [1, -2 * r * np.cos(w), r * r], x + 1e-18)


def glide(x, ratio):
    """Time scaling: reading a steady sound at a changing speed moves all its resonances by that ratio."""
    return np.interp(np.cumsum(ratio), np.arange(N), x, period=N)


def burst(decay_s):
    """Exponentially decaying noise: a contact as a rush of tiny impacts."""
    return rng.standard_normal(len(BLOW)) * np.exp(-BLOW / decay_s)


def scuff(contact_s):
    """Soft contact: the noise swells before it dies away."""
    age = BLOW / contact_s
    return rng.standard_normal(len(BLOW)) * age * np.exp(-age)


def small_body(x, edge_hz):
    """Radiation cutoff: a small object radiates little below its lowest mode."""
    return signal.sosfilt(signal.butter(4, edge_hz, "high", fs=SR, output="sos"), x)


def colour(x, spectrum, size=4096):
    """Causal minimum-phase filtering, by folding the cepstrum of the given spectrum."""
    log_gain = np.log(from_db(at_hz(spectrum, np.fft.rfftfreq(size, 1 / SR))))
    cepstrum = irfft(log_gain)
    cepstrum[1:size // 2] *= 2
    cepstrum[size // 2 + 1:] = 0
    return signal.oaconvolve(x, irfft(np.exp(rfft(cepstrum))))[:len(x)]


def at_hz(points, hz):
    """Interpolation of a spectrum on a log-frequency axis."""
    f, value = np.transpose(points)
    return np.interp(np.log(hz + 1), np.log(f), value)


def gains(rows):
    """Envelopes: the dB columns of a table as gains in time, silent outside it."""
    s, *columns = np.transpose(rows)
    return [from_db(np.interp(TIME, s, c, left=-np.inf, right=-np.inf)) for c in columns]


def from_db(db):
    """Logarithmic level: decibels to amplitude gain."""
    return 10 ** (np.asarray(db) / 20)


def rms_one(x):
    """Power normalisation: a steady sound at rms 1."""
    return x / np.sqrt(np.mean(x ** 2) + 1e-20)


def unit_blow(x):
    """Energy normalisation: a blow with the energy of 10 ms at rms 1."""
    return x / np.sqrt(np.sum(x ** 2) / (SR / 100) + 1e-20)


def add(track, s, sound):
    """Superposition: mix a sound in at time s."""
    start = round(s * SR)
    track[start:start + len(sound)] += sound[:N - start]


def pan(x, left_db):
    """Interchannel level difference: left stands left_db above right."""
    return x * from_db([[left_db / 2], [-left_db / 2]])


def scene():
    """Direct plus reflected sound: the hand shields the knocks from the walls; the punch differs by channel."""
    paper = sheet() + pan(brushes() + creak() + slide_away(), left_db=1.0)
    touches = knocks() + pings() + bumps()

    # the part common to both channels, and a weaker part of opposite sign in each
    front = (-1) ** np.arange(len(PUNCH_MODES))
    flank = rng.choice([-1, 1], len(PUNCH_MODES))
    punch = snaps(front) + from_db(-11) * snaps(flank) * [[1], [-1]] + spring()

    radiated = paper.mean(axis=0) + from_db(-10.0) * snap_spread()
    shielded = touches.mean(axis=0)
    space = room(to_desk=radiated + from_db(2.5) * shielded, to_walls=radiated + from_db(-9) * shielded)
    return paper + touches + punch + space + room_tone()


def record(dry):
    """Phase between channels, clipping and band limit: treble out of step, peaks cut flat, the top removed."""
    size = next_fast_len(N + 4096)
    phase = at_hz(CHANNEL_PHASE, np.fft.rfftfreq(size, 1 / SR))
    turned = rfft(dry, size) * np.exp(.5j * phase * [[1], [-1]])
    heard = irfft(turned, size)[:, :N]
    low_pass = signal.cheby2(16, 60, CUTOFF_HZ + 700, fs=SR, output="sos")   # 60 dB down at its edge
    return signal.sosfilt(low_pass, np.clip(heard, -1, 1))


dry = scene()
out = record(dry)
wav_out(out)
```